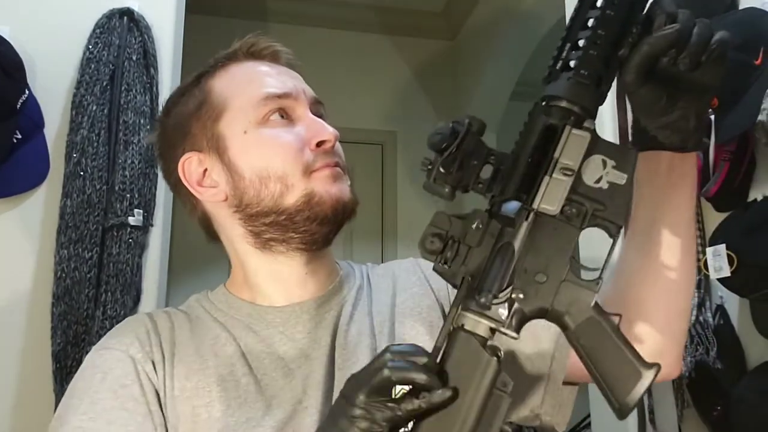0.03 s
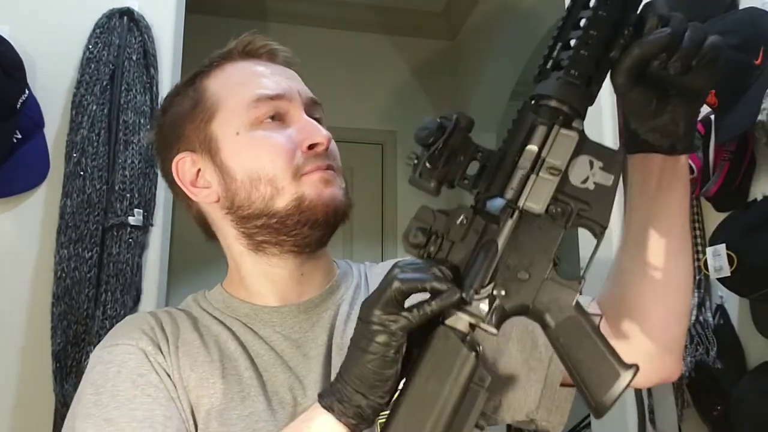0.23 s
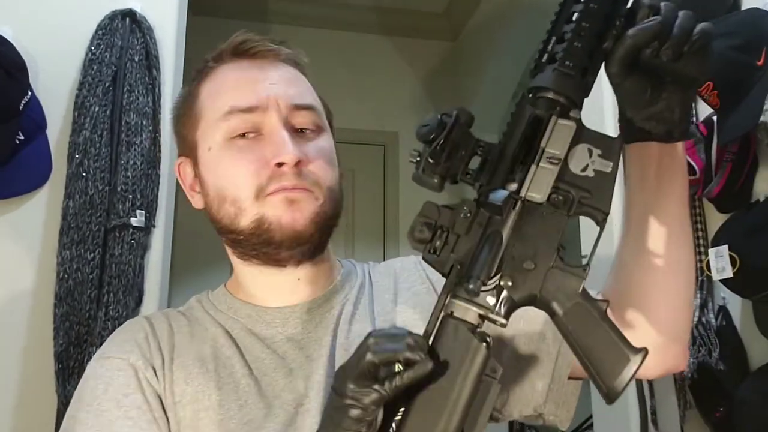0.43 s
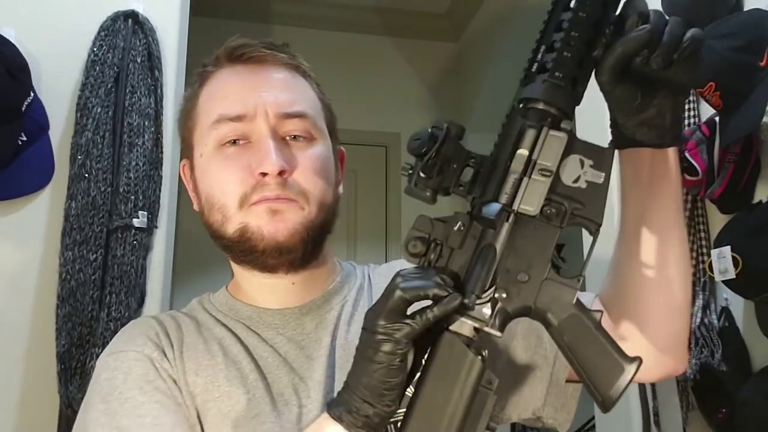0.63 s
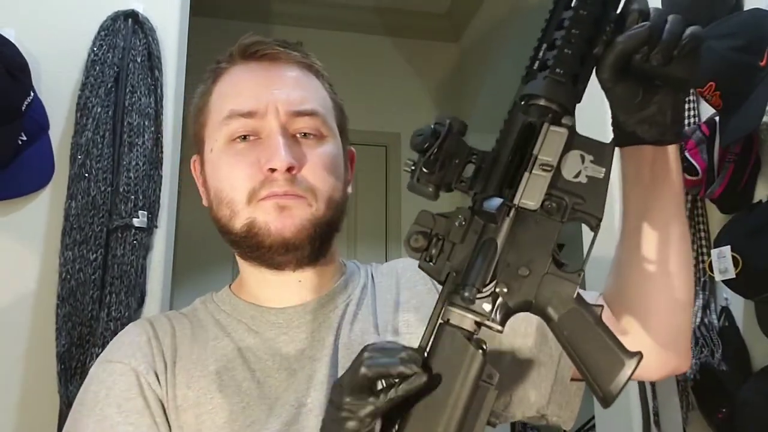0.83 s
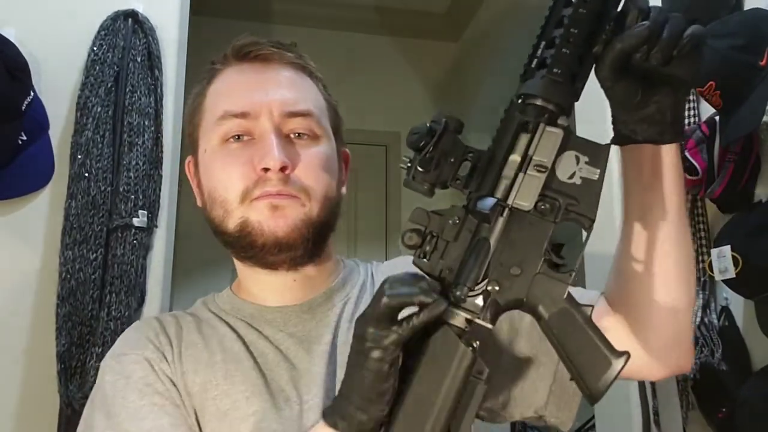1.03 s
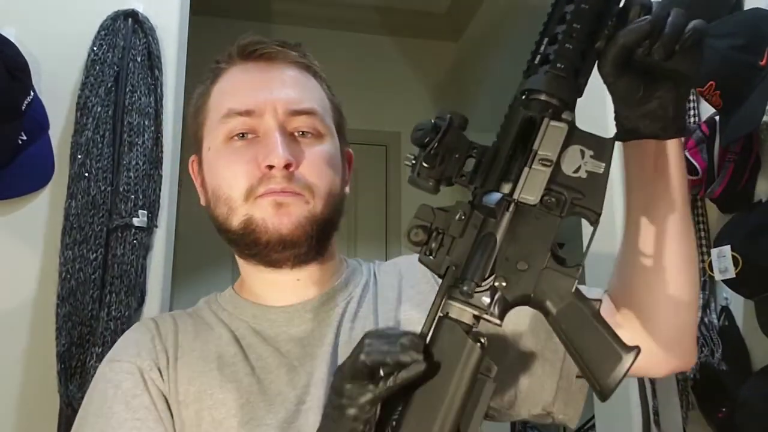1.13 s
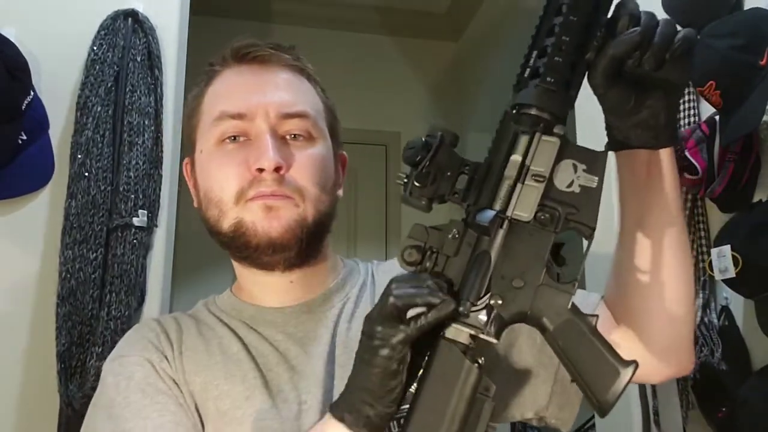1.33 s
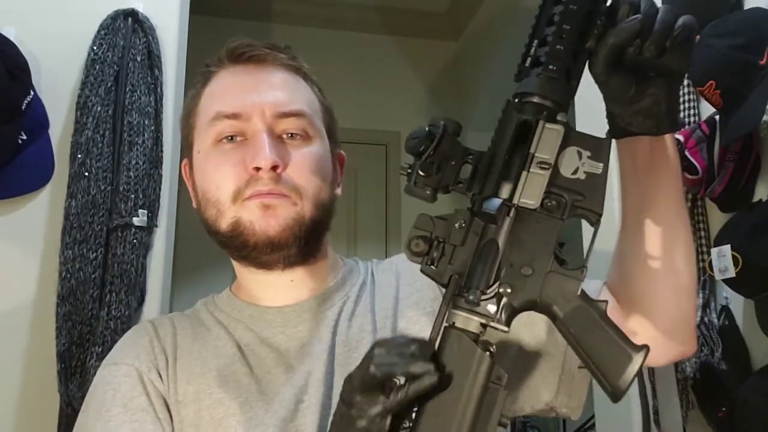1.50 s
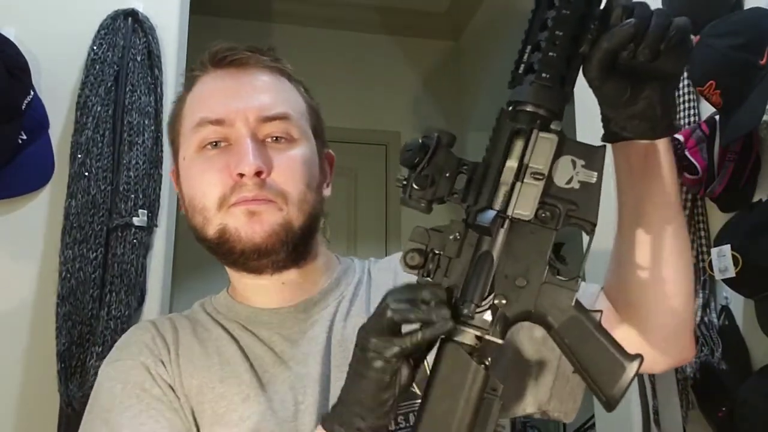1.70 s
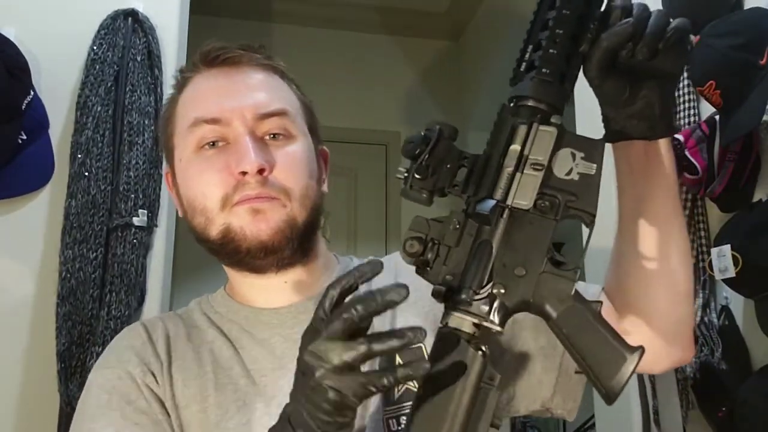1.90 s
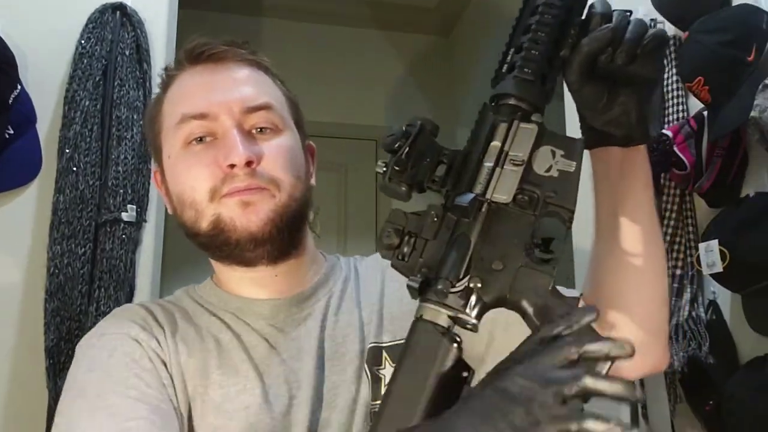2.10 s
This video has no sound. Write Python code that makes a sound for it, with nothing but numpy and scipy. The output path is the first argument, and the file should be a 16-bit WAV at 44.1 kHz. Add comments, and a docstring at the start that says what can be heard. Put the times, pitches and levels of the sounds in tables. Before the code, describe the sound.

An airsoft rifle's charging handle snaps shut with a light thud at the start and again at 0.2 seconds. Four pulls follow, ending in hollow, springy clacks at about 0.5, 0.8, 1.2 and 1.6 seconds, with latch ticks between. Each return scrapes and snaps home, the last and loudest snap near 1.8 seconds. It sounds close and slightly left, in a small room with a faint hum.

```python
"""A snap and a thud, close to the microphone: the charging handle of an airsoft rifle shuts in a small room.
A gloved hand lets it shut again, then works it four times. Each pull ticks off the latch and ends in a
hollow clack whose sprung parts rebound two or three times; each return scrapes forward and snaps home.
The room rings briefly behind every blow, over faint air, mains hum and handling rumble.
The rifle sits a little to the left of the stereo microphone."""
import sys
import numpy as np
from scipy import signal
from scipy.fft import rfft, irfft
from scipy.io import wavfile

SR = 44100
rng = np.random.default_rng(int(sys.argv[2]) if len(sys.argv) > 2 else 0)


def wav_out(sig):
    """Save sig, one row per channel (or a flat mono array), as 16-bit PCM at SR to the path in sys.argv[1]."""
    wavfile.write(sys.argv[1], SR, np.round(np.clip(np.atleast_2d(sig).T, -1, 1) * 32767).astype(np.int16))


N = 94815

# The handle hits its rear stop. Each row: start in seconds, level in dB, brightness in dB per octave,
# spring ping in dB.
CLACKS = [(0.4644, 10, 0, -0.5), (0.8201, 10.5, 0, -1.5), (1.1863, 11.5, 2, 3), (1.556, 9.5, -1.5, -5)]
# The sprung parts land again. Each row: start in seconds, level in dB.
REBOUNDS = [(0.5059, 1.5), (0.529, -4), (.860, 1), (.881, -10.5), (1.2276, 0.5), (1.249, -25), (1.593, 3.5),
            (1.6196, -1), (1.634, -12.5)]
# The handle shuts. Each row: start in seconds, snap in dB, brightness in dB per octave,
# rattle decay in seconds, thud in dB.
SHUTS = [(-.004, -1, -2.5, 0.011, -12.5), (0.2381, 6.5, -0.5, 0.0013, -9.5), (0.6382, 6, -1, 0.0052, -10),
         (1.015, -3.5, -2, 0.0029, -12.5), (1.381, 5, -1, 0.0065, -10.5), (1.7568, 12, 2, 0.017, -11)]
# Latch and loose parts tick. Each row: start in seconds, level in dB, brightness in dB per octave.
TICKS = [(.1073, -18.5, -1.5), (.1875, -11.5, 3), (.1975, -9, 1), (.2197, 0.8, 0), (.2665, -5, -1.5),
         (.33, -18, 1), (.37, -9, 8), (.3834, -4.5, 3), (.4285, -1.5, 2), (.4583, -8, -3), (.588, -20, 2),
         (.597, -21, 3), (.6095, -9, -4.5), (.6205, -1, -3), (.6644, -4, 2), (.7402, -10, 9.5),
         (.7517, -2, 6.5), (.814, -8, 0.5), (.921, -12, 0.5), (.9625, -12.5, -1), (.9695, -9.5, -1),
         (.9844, -6.5, -3.5), (.9945, -2.5, -1.5), (1.038, -4, 0.5), (1.103, -8.5, 1), (1.114, -1, 6.5),
         (1.1515, -0.5, 1), (1.1809, -2.5, 1), (1.332, -14, 1), (1.3636, -1, 0), (1.409, -2.5, 2),
         (1.4864, -10, -0.5), (1.4981, -1, 4.5), (1.551, -2.5, -3), (1.715, -14, 1), (1.728, -9, 4),
         (1.743, -2, -1)]
# The handle slides in its channel. Each row: start in seconds, length in seconds, base level in dB,
# growth over the slide in dB. A slide opens at its base level plus 1.5 times its growth.
SLIDES = [(.11, .075, -39, -5), (.19, .05, -50, 7), (.32, .06, -51.5, 2), (0.435, 0.021, -43, 2),
          (0.589, .053, -45, 7), (.70, 0.12, -47, 3), (.93, .035, -53.5, 1.5), (.965, .06, -36.5, 2.5),
          (1.06, 0.11, -45.5, 0), (1.33, .05, -45.5, 4.5), (1.45, .10, -51, 4), (1.659, 0.052, -51, 2),
          (1.724, 0.036, -45.5, 8.5)]

# Spectra of the four kinds of contact and of the room air. Each row: frequency in Hz, relative level in dB.
CLACK_COLOUR = [(210, -48.5), (290, -7), (480, -32.5), (790, -17.5), (1160, -4.5), (1490, 1), (1850, 1.5),
                (2350, -12.5), (2950, -2.5), (3400, -12), (6000, -9.5), (6800, -2.5), (8400, -23),
                (12300, -11.5), (15000, -30)]
KNOCK_COLOUR = [(200, -39.5), (290, -14), (450, -37.5), (810, -16), (1000, -14), (1300, -7), (1650, -3),
                (2100, -23), (4000, -19.5), (8000, -42.5), (12000, -30), (15000, -43)]
SNAP_COLOUR = [(300, -23), (500, -16), (800, -6.5), (1330, -2), (2200, -2), (3500, -1), (6500, -4.5),
               (8600, -10), (12000, -7.5), (13900, -10), (15000, -31.5)]
TICK_COLOUR = [(120, -45), (200, -9.5), (503, -13.5), (761, -3.5), (2250, 3), (3540, -2), (3940, 1.5),
               (5860, -7.5), (7550, -4), (8410, -9.5), (12100, -7), (15000, -14.5)]
AIR_COLOUR = [(25, -18), (60, -10.5), (125, -15.5), (200, -25), (400, -36.5), (700, -32), (1200, -39.5),
              (6400, -37), (15000, -52.5)]
# Modes of the hollow receiver, the spring and the whole rifle. Each row: frequency in Hz, strength in dB.
RECEIVER_MODES = [(815, -9), (1089, -10), (1210, -6), (1268, -6), (1305, -4), (1351, -2), (1409, -3),
                  (1492, 0), (1601, -7), (1672, -3), (1838, -7)]
SPRING_MODES = [(3796, -13), (6389, -10), (6717, 0)]
BODY_MODES = [(104, -6.5), (152, -8), (238, -2), (296, 0.5), (345, -3), (640, -3.5)]

# Reverberation of the small room. Each row: frequency in Hz, time to fall 60 dB in seconds.
ROOM_T60 = [(120, 0.38), (700, .24), (1500, 0.23), (5000, 0.23), (13000, 0.2)]
# Course of the low handling rumble. Each row: time in seconds, level in dB.
RUMBLE_LEVELS = [(0, -65), (.13, -56.5), (.25, -70), (1., -67), (1.8, -66), (2.1, -88)]
# Balance of the two microphone ports. Each row: frequency in Hz, left over right in dB.
PORT_BALANCE = [(60, 0), (110, 1.5), (200, 8), (400, 1), (1300, 4), (2400, 2), (4400, 3), (8000, 7),
                (14000, -1)]

PORT_LAG_S = 0.00018  # the right port hears a contact this much later
RECEIVER_T60_S, SPRING_T60_S, BODY_T60_S = 0.13, 0.1, 0.11


def clacks():
    """The handle hits its stop, ringing receiver and spring; the sprung parts land again, duller."""
    out = np.zeros((2, N))
    for start, db, tilt_db, ping_db in CLACKS:
        add(out, start, undb(db - 8.5) * knock())
        add(out, start, undb(db) * contact(CLACK_COLOUR, tilt_db, chatter_s=0.0062, touch_db=-14))
        add(out, start, undb(db - 5) * ring(RECEIVER_MODES, RECEIVER_T60_S))
        loose_buzz = contact(SNAP_COLOUR, chatter_s=0.04, touch_db=-7.5, size=8192)
        add(out, start, undb(db - 7) * loose_buzz)
        add(out, start, undb(ping_db) * ring(SPRING_MODES, SPRING_T60_S))
    for start, db in REBOUNDS:
        add(out, start, undb(db) * knock())
        add(out, start, undb(db - 4) * ring(RECEIVER_MODES, RECEIVER_T60_S))
    return out


def knock():
    """One hollow landing: a firm touch with very little chatter."""
    return contact(KNOCK_COLOUR, chatter_s=0.0033, touch_db=0)


def shuts():
    """The handle snaps home, rattles and jolts the whole rifle; returns snaps and thuds."""
    snaps, thuds = np.zeros((2, N)), np.zeros((2, N))
    for start, snap_db, tilt_db, rattle_s, thud_db in SHUTS:
        snap = contact(SNAP_COLOUR, tilt_db, chatter_s=rattle_s, touch_db=-7.5)
        add(snaps, start, undb(snap_db) * snap)
        add(thuds, start, undb(thud_db) * ring(BODY_MODES, BODY_T60_S))
    return snaps, thuds


def ticks(ring_hz=2880):
    """Light metal contacts of the latch and loose parts, each with four short modes of its own."""
    out = np.zeros((2, N))
    for start, db, tilt_db in TICKS:
        add(out, start, undb(db) * contact(TICK_COLOUR, tilt_db, chatter_s=0.0081, touch_db=-14))
        octaves = 0.6 * rng.uniform(-1.3, 1, 4)
        modes = [(hz, 0) for hz in ring_hz * 2 ** octaves]
        add(out, start, undb(db - 9 - tilt_db) * ring(modes, t60_s=0.02))
    return out


def slides(grains_per_s=1900):
    """The handle scrapes along its channel in stick-slip grains of uneven size."""
    t, effort = np.arange(N) / SR, np.zeros(N)
    for start, length, base_db, growth_db in SLIDES:
        along = (t - start) / length
        moving = abs(along - 0.5) < 0.5
        effort += moving * undb(base_db + growth_db * (np.clip(along, 0, 1) + 1.5))
    slips = rng.random(N) < grains_per_s / SR
    sizes = undb(-0.5 * np.minimum(rng.exponential(size=N), 4))
    grains = unit(slips * sizes * rng.uniform(-1, 1, (2, N))) * np.sqrt(N)
    return through(grains * effort, colour(TICK_COLOUR))


def contact(spectrum, tilt_db=0, *, chatter_s, touch_db, size=4096, shared=0.19):
    """Two parts meet: a sharp first touch, then uneven dying chatter, partly shared by both ports."""
    t = np.arange(size) / SR
    grit = np.repeat(undb(1.5 * rng.standard_normal(size // 32)), 32)
    chatter = unit(rng.standard_normal((3, size)) * grit * np.exp(-t / chatter_s))
    push = np.sqrt(shared) * chatter[2] + np.sqrt(1 - shared) * chatter[:2]
    push[:, 0] += undb(touch_db)
    push[1] = np.roll(push[1], int(PORT_LAG_S * SR))
    return unit(through(push, colour(spectrum, tilt_db)))


def ring(modes, t60_s, attack_s=0.001, size=16384):
    """Struck modes die away; each blow shifts their strength, and each port hears another phase."""
    t, tones = np.arange(size) / SR, 0
    for hz, db in modes:
        stray_db, stray_phase, stray_lag = rng.standard_normal(3)
        lag = np.array([[0], [1 + stray_lag]]) * PORT_LAG_S
        tones += undb(db + stray_db) * np.sin(2 * np.pi * hz * (t - lag) + np.pi * stray_phase)
    attack = 1 - np.exp(-(t / attack_s) ** 2)
    return unit(tones * attack * decay(t, t60_s))


def room_tail(build_s=0.004, size=22050):
    """Dense reflections off near walls, unrelated left and right, shorter in the treble."""
    t, hz = np.arange(size) / SR, np.fft.rfftfreq(size, 1 / SR)
    noise, tail = rfft(rng.standard_normal((2, size))), 0
    octave = np.log2(np.clip(hz, 125, 16000) / 125)
    for k in range(8):
        band = irfft(noise * np.maximum(1 - abs(octave - k), 0), size)
        tail += band * decay(t, on_log(125 * 2 ** k, ROOM_T60))
    build_up = 1 - np.exp(-(t / build_s) ** 2)
    return unit(tail * build_up)


def handling_rumble(centre_hz=61.6, width_hz=16):
    """Handling puts a narrow band of low noise on both ports, swelling and sinking."""
    t, hz = np.arange(N) / SR, np.fft.rfftfreq(N, 1 / SR)
    resonance = 1 / (1 + (2 * (hz - centre_hz) / width_hz) ** 2)
    rumble = unit(irfft(rfft(rng.standard_normal(N)) * resonance, N)) * np.sqrt(N)
    return rumble * undb(np.interp(t, *np.array(RUMBLE_LEVELS).T))


def room_tone(air_db=-72, hum_db=-72.5, hum_hz=119.5):
    """Quiet room air, half of it common to both ports, and a steady mains hum."""
    noise = (rng.standard_normal((2, N)) + rng.standard_normal(N)) / np.sqrt(2)
    air = through(noise, colour(AIR_COLOUR, size=8192))
    hum = np.sqrt(2) * np.sin(2 * np.pi * hum_hz * np.arange(N) / SR)
    return undb(air_db) * air + undb(hum_db) * hum


def colour(points, tilt_db=0, size=2048):
    """Causal response of energy 1 with the given spectrum, tilted per octave above 882 Hz."""
    hz = np.maximum(np.fft.rfftfreq(size, 1 / SR), 1)
    db = on_log(hz, points) + tilt_db * np.log2(np.maximum(hz, 882))
    low_cut = 1 + (points[0][0] / 2 / hz) ** 2
    cepstrum = irfft(np.log(undb(db) / low_cut))
    cepstrum[1:size // 2] *= 2  # minimum phase keeps the attack sharp
    cepstrum[size // 2 + 1:] = 0
    return unit(irfft(np.exp(rfft(cepstrum))))


def on_log(hz, points):
    """Read a table of frequencies and values along a log-frequency axis."""
    frequencies, values = np.array(points).T
    return np.interp(np.log(np.maximum(hz, 1)), np.log(frequencies), values)


def add(track, start, sound):
    """Mix a sound into a track at a start in seconds, trimming what falls outside."""
    i = int(round(start * SR))
    sound = sound[:, max(-i, 0):N - i]
    track[:, max(i, 0):max(i, 0) + sound.shape[1]] += sound


def unit(x):
    """Scale each channel to energy 1."""
    return x / np.sqrt(np.sum(x ** 2, axis=-1, keepdims=True))


def through(x, response):
    return signal.fftconvolve(np.atleast_2d(x), np.atleast_2d(response), axes=-1)[:, :N]


def decay(t, t60_s):
    return np.exp(-np.log(1000) * t / t60_s)


def pan(left_db):
    return undb(np.array([[left_db], [-left_db]]) / 2)


def undb(db):
    return 10 ** (np.asarray(db) / 20)


def scene():
    """The rifle close up and a little left, with the small room behind it."""
    tail = room_tail() * pan(left_db=1.5)

    def in_room(sound, left_db, room_db):
        return sound * pan(left_db) + undb(room_db) * through(sound, tail)

    snaps, thuds = shuts()
    return (in_room(clacks(), left_db=2.5, room_db=-7)
            + in_room(snaps, left_db=1.5, room_db=-2.5)
            + in_room(thuds, left_db=4, room_db=-4)
            + in_room(ticks() + slides(), left_db=2, room_db=-5.5)
            + room_tone() + handling_rumble())


def record(dry):
    """The left port hears more than the right; the recorder rounds the loudest peaks and cuts the top."""
    size, top_hz = 2 * N, 14700
    left_db = on_log(np.fft.rfftfreq(size, 1 / SR), PORT_BALANCE)
    port_gains = undb(np.array([left_db, -left_db]) / 2)
    ports = irfft(rfft(dry, size) * port_gains, size)[:, :N]
    top_cut = signal.ellip(8, 0.2, 70, top_hz, fs=SR, output="sos")
    return signal.sosfilt(top_cut, np.tanh(ports))


dry = scene()
out = record(dry)
wav_out(out)
```